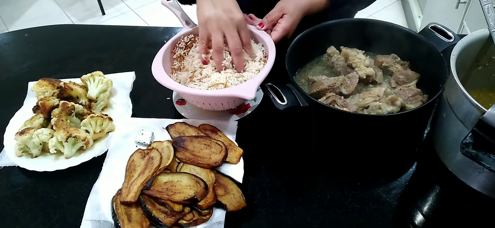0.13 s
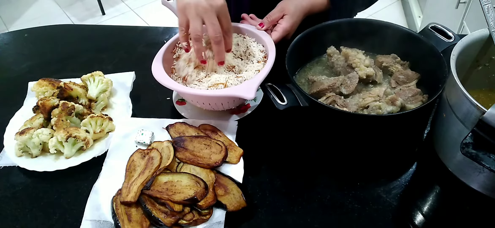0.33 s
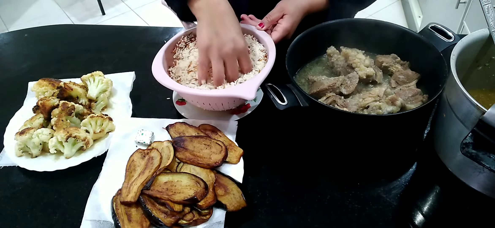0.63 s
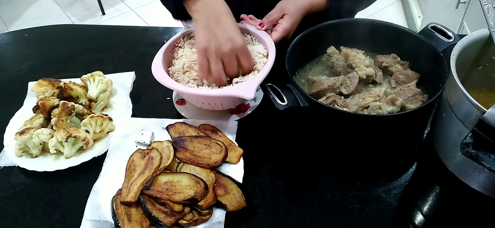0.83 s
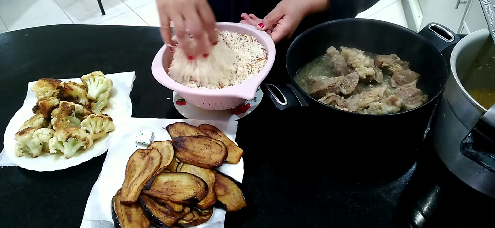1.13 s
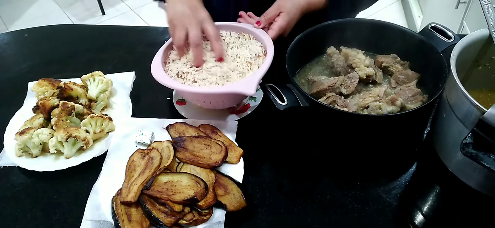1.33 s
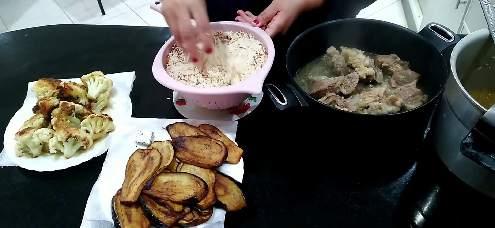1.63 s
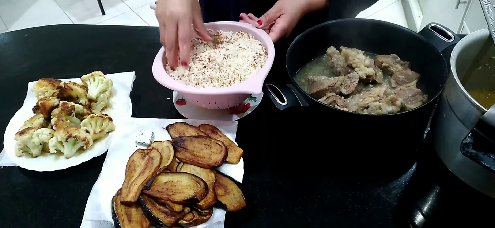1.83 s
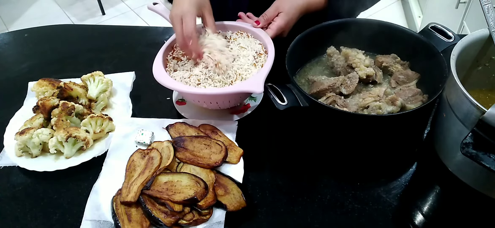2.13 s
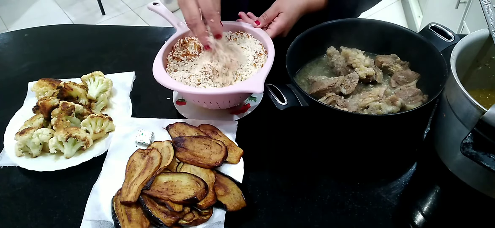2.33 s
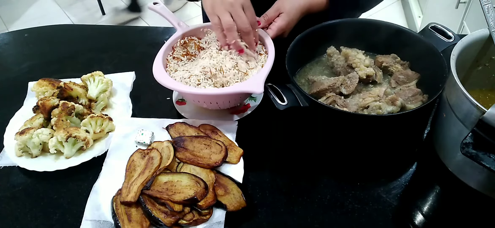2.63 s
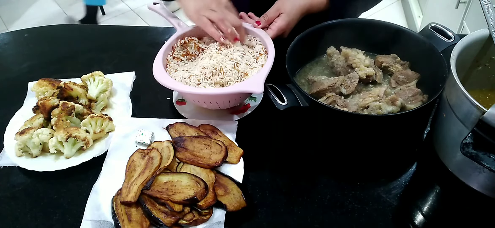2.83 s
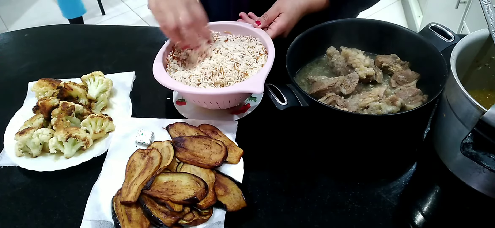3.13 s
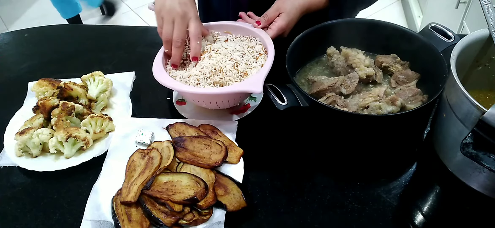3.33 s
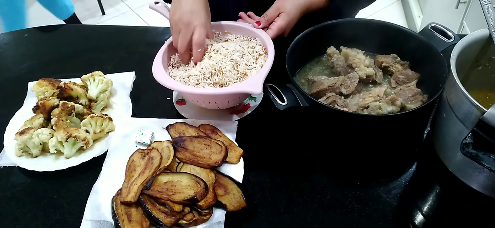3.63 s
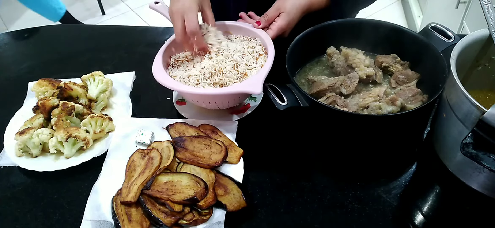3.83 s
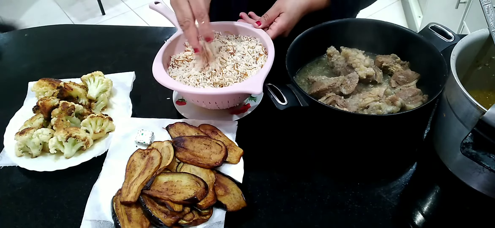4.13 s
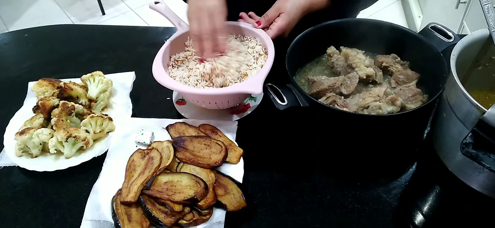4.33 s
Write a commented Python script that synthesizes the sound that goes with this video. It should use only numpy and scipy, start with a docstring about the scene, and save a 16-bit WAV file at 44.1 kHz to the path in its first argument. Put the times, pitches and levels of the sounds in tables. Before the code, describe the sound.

In a quiet kitchen, a low hum and soft rumble run under faint, even ticking, like a wind-up timer a little way off. Close by, a hand sweeps through dry rice in a plastic colander, making brief grainy rustles, tiny clicks and soft rubs on the bowl. The strongest sweeps come early, followed by a pause and then a few gentler ones.

```python
"""Fingers stir dry rice and toasted noodles in a plastic colander in a quiet kitchen.
From the start: mains hum, a rumble, a dull swelling rush, and something like a clockwork timer ticking.
Near 0.5 s, then loudest at 1.1-1.3 s, finger sweeps make grains collide in short rustles; single grains
snap on the plastic and fingers scrape the bowl. A lull with faint ticking and hiss follows.
Lighter sweeps return from 2.7 s, the last at 4.4 s."""
import sys
import numpy as np
from scipy import signal
from scipy.fft import rfft, irfft
from scipy.io import wavfile
from scipy.ndimage import uniform_filter1d

SR = 44100
rng = np.random.default_rng(int(sys.argv[2]) if len(sys.argv) > 2 else 0)


def store_pcm(level_fs):
    """Save levels as 16-bit WAV."""
    pcm = np.round(np.clip(level_fs, -1, 1) * 32767).astype(np.int16)
    wavfile.write(sys.argv[1], SR, np.atleast_2d(pcm).T)


N = 198141
T = np.arange(N) / SR
HZ = np.fft.rfftfreq(N, 1 / SR)

# Finger sweeps. Each row: start in seconds, end in seconds, position of the hardest push (0-1),
# level in dB, tilt in dB per octave, digging share (0 pouring, 1 digging).
SWEEPS = [(0.511, 0.554, .45, -58, 0.5, 0.88), (0.536, 0.584, 0.5, -62, -3, 0.82),
          (1.067, 1.15, 0.68, -65, -2.5, 0.73), (1.126, 1.248, 0.41, -55.5, -2, 0.48),
          (1.194, 1.317, 0.38, -57, -2.5, 0.49), (2.744, 2.771, 0.5, -72.5, -1, 0.44),
          (2.768, 2.82, 0.56, -70, 0, 0.23), (2.821, 2.872, .25, -69.5, -7.5, .1),
          (3.272, 3.358, .2, -62, -2, 0.79), (3.436, 3.476, 0.2, -79, 1, .3),
          (3.482, 3.524, .4, -76.5, 3, 0.95), (3.523, 3.555, .55, -72, 2, 1),
          (3.55, 3.64, 0.69, -61.5, 1, 1), (3.838, 3.88, 0.56, -71, -9.5, 0.49),
          (4.439, 4.468, 0.8, -70.5, 4.5, 1)]


def amp(db):
    """Decibels to gain."""
    return 10 ** (np.asarray(db) / 20)


def unit_rms(x):
    """Scales to rms 1."""
    return x / np.sqrt(np.mean(x ** 2) + 1e-20)


def curve_at(points, hz):
    """Interpolates (Hz, value) points on a log-frequency axis."""
    points_hz, values = np.transpose(points)
    return np.interp(np.log(hz + 1), np.log(points_hz + 1), values)


def pan(left_db):
    """Stereo gains for a left-minus-right level."""
    return amp(np.array([[.5], [-.5]]) * left_db)


def add(mix, start_s, sound):
    """Mixes a stereo sound in at start_s."""
    part = mix[:, max(round(start_s * SR), 0):][:, :sound.shape[1]]
    part += sound[:, :part.shape[1]]


def colour(x, db_at_hz, size=1024):
    """Minimum-phase filter of unit energy."""
    log_gain = np.log(amp(db_at_hz(abs(np.fft.fftfreq(size, 1 / SR)))))
    taps = np.fft.ifft(np.exp(signal.hilbert(log_gain).conj())).real[:size // 2]
    return signal.fftconvolve(x, taps[None] / np.linalg.norm(taps), axes=1)[:, :x.shape[1]]


def collisions(samples, per_s, spread_db):
    """Random tiny impacts of uneven size, independent in each channel."""
    size = amp(spread_db * np.minimum(rng.exponential(1, (2, samples)), 3))
    sign = rng.choice([-1, 1], (2, samples))
    hits = rng.random((2, samples)) < per_s / SR
    return unit_rms(size * sign * hits)


def swells(rows, rest_db):
    """Gain of Gaussian swells, summed in power over a resting level."""
    power = sum((amp(db) * np.exp(-((T - mid_s) / half_s) ** 2)) ** 2 for mid_s, half_s, db in rows)
    return np.sqrt(amp(rest_db) ** 2 + power)


def diffuse_noise(spectrum):
    """Unit-rms noise; the channels agree in the bass and part in the treble."""
    # Each row: frequency in Hz, left-right correlation.
    correlation = [(40, 0.75), (120, 0.89), (250, 0.74), (500, 0.53), (1000, -0.23), (2000, 0.04),
                   (15000, -0.075)]
    # Each row: frequency in Hz, left minus right in dB.
    balance = [(30, 6), (60, 5.5), (125, 0), (500, 1), (1500, -0.6), (8000, 0)]
    left, other = rfft(rng.standard_normal((2, N)))
    likeness = curve_at(correlation, HZ)
    pair = np.array([left, likeness * left + np.sqrt(1 - likeness ** 2) * other])
    return unit_rms(irfft(pair * amp(curve_at(spectrum, HZ)) * pan(curve_at(balance, HZ)), N))


def room(x, wet_db):
    """Adds the short tail of a tiled kitchen; the top treble dies first."""
    # Each row: frequency in Hz, T60 in seconds.
    decay_times = [(300, 0.24), (2500, 0.27), (5000, 0.23), (10000, 0.18)]
    echoes = rng.choice([-1., 1.], (2, SR // 2)) * (rng.random((2, SR // 2)) < 3000 / SR)
    hz, t, bands = signal.stft(echoes, SR, nperseg=256)
    decay = amp(-60 * t / curve_at(decay_times, hz)[:, None]) * (t > .005)
    tail = signal.istft(bands * decay, SR, nperseg=256)[1]
    return x + amp(wet_db) * signal.fftconvolve(x, tail / np.linalg.norm(tail[0]), axes=1)[:, :N]


def air(level_db=-54.5):
    """Steady low noise of the kitchen air."""
    # Each row: frequency in Hz, relative level in dB.
    spectrum = [(15, 4.5), (30, -2), (45, -3.5), (62, -8.5), (85, -4.5), (125, 0.5), (200, -15.5),
                (330, -16), (600, -27), (1000, -35.5), (1600, -50), (5000, -58.5), (9500, -55.5),
                (14000, -57)]
    return amp(level_db) * diffuse_noise(spectrum)


def mains_hum():
    """An appliance hums in steady tones."""
    # Each row: frequency in Hz, rms level before panning in dB.
    tones = [(100.1, -56), (125, -73.5), (168, -73), (300.3, -79), (570, -99)]
    hum = sum(amp(db) * np.sqrt(2) * np.sin(2 * np.pi * (hz * T + rng.random())) for hz, db in tones)
    return hum * pan(left_db=5.5)


def rumble(gain_db=-2):
    """A deep rumble comes and goes."""
    # Each row: frequency in Hz, relative level in dB.
    spectrum = [(10, -24.5), (28, -13.5), (38, -1), (46, 4.5), (52, -4.5), (62, -24), (110, -42.5),
                (400, -81.5)]
    # Each row: middle in seconds, half-width in seconds, relative level in dB.
    surges = [(.1, 0.21, -44.5), (.63, .19, -43.5), (1.1, 0.15, -44.5), (1.42, 0.34, -50.5),
              (2.0, 0.13, -47.5), (3.04, 0.059, -47.5), (3.5, 0.17, -52.5), (4.1, 0.44, -47.5)]
    bass = diffuse_noise(spectrum)
    local_power = uniform_filter1d((bass ** 2).mean(0), size=6000)
    steady = unit_rms(bass / np.sqrt(local_power + 0.14))  # flattened so the swells dominate
    return amp(gain_db) * swells(surges, rest_db=-55.5) * steady


def rush(rise_s=0.1, fall_s=0.19, rest_db=-73):
    """A dull rush repeatedly swells fast and dies more slowly."""
    # Each row: frequency in Hz, relative level in dB.
    spectrum = [(80, -22), (190, 7), (270, 5.5), (450, -1.5), (680, -2.5), (900, -18.5), (1300, -32),
                (2500, -33.5), (5000, -57)]
    # Each row: peak time in seconds, level in dB.
    peaks = [(.02, -58.5), (0.442, -55), (.99, -59), (1.55, -64.5), (2.33, -69), (3.949, -59), (4.42, -63)]
    power = amp(rest_db) ** 2
    for peak_s, db in peaks:
        envelope = np.exp(-np.where(T < peak_s, ((T - peak_s) / rise_s) ** 2, (T - peak_s) / fall_s))
        power = power + (amp(db) * envelope) ** 2
    return np.sqrt(power) * diffuse_noise(spectrum)


def escapement(rattle_s, decay_s, ring_db, pitch_ratio):
    """One strike: the metal rings and the parts rattle briefly."""
    # Metal modes. Each row: frequency in Hz at pitch ratio 1, relative level in dB, T60 in seconds.
    modes = [(2173, 3.5, 0.043), (2383, 1, 0.033), (2520, -12, 0.02), (3390, -11.5, 0.16),
             (8970, -0.5, 0.025), (9000, -3, 0.011), (9850, -15, 0.026)]
    # Each row: frequency in Hz, relative level in dB.
    rattle_spectrum = [(500, 3.5), (1500, -7), (2200, 2), (2700, -2), (3400, -2), (4700, -8.5),
                       (5900, -8.5), (7500, -13.5), (8800, -4.5), (9900, -4.5), (11000, -22.5),
                       (15000, -25.5)]
    ring_rise_s, rattle_rise_s, release_s, detune = 0.0024, 0.0056, 0.0087, 0.012
    t = np.arange(SR // 10) / SR
    ring = np.zeros(len(t))
    for hz, db, t60_s in modes:
        mode_hz = pitch_ratio * hz * rng.normal(1, detune)
        ring += amp(db - 60 * t / t60_s) * np.sin(2 * np.pi * mode_hz * t)
    gate = np.clip(t / rattle_rise_s, 0, 1) * np.clip((rattle_s - t) / release_s, 0, 1)
    impacts = collisions(len(t), per_s=7600, spread_db=8.5) * np.exp(-t / decay_s) * gate
    rattle = colour(impacts, lambda hz: curve_at(rattle_spectrum, hz))
    return amp(ring_db) * ring * np.clip(t / ring_rise_s, 0, 1) + rattle


def clockwork(first_s=0.056, period_s=0.4609, tock_delay_s=0.245, tock_db=-71.5):
    """A strong tick alternates with a weak, shorter, slightly lower tock."""
    # Each row: tick level in dB, gain of the ring against the rattle in dB.
    ticks = [(-61.5, -2.5), (-59.5, 3), (-62, -9.5), (-64, -10), (-66, -5), (-64.5, -13), (-64.5, -3),
             (-60, -8), (-61, -2), (-63.5, -2.5)]
    out = np.zeros((2, N))
    for k, (db, ring_db) in enumerate(ticks):
        start_s = first_s + k * period_s
        tick = escapement(rattle_s=0.031, decay_s=0.03, ring_db=ring_db, pitch_ratio=1)
        tock = escapement(rattle_s=0.021, decay_s=0.044, ring_db=-7.5, pitch_ratio=0.93)
        add(out, start_s, amp(db) * tick)
        add(out, start_s + tock_delay_s, amp(tock_db) * tock)
    return out * pan(left_db=2.8)


def grainy_hiss(rest_db=-87.5, settle_db=-31, settle_s=0.096):
    """A faint grainy hiss swells, partly just after the ticks, and settles after each sweep."""
    # Each row: frequency in Hz, relative level in dB.
    spectrum = [(500, -4), (1300, -0.5), (2500, -0.5), (4000, -2.5), (6500, -10), (9500, -9.5),
                (12000, -35)]
    # Each row: middle in seconds, half-width in seconds, level in dB.
    faint_swells = [(1.97, 0.13, -87), (2.88, 0.048, -83.5), (3.3, 0.42, -91), (3.95, 0.31, -84)]
    power = swells(faint_swells, rest_db) ** 2
    for start_s, end_s, _, db, _, _ in SWEEPS:
        since_s = T - (start_s + end_s) / 2
        power += (since_s > 0) * (amp(db + settle_db) * np.exp(-abs(since_s) / settle_s)) ** 2
    hiss = collisions(N, per_s=5500, spread_db=2.0)
    return np.sqrt(power) * colour(hiss, lambda hz: curve_at(spectrum, hz))


def scrapes():
    """Friction on the bowl, one resonance each: hollow under finger pads, sharp under nails."""
    # Each row: middle in seconds, half-width in seconds, resonance in Hz,
    # resonance half-width in octaves, level in dB.
    rubs = [(0.045, 0.16, 222, 0.24, -65), (0.52, 0.18, 202, 0.23, -62.5), (0.95, 0.021, 764, 0.23, -69),
            (1.04, 0.11, 187, 0.31, -67.5), (1.113, 0.015, 3400, 0.1, -66), (1.166, 0.028, 3320, 0.13, -59),
            (1.586, 0.12, 677, 0.21, -69), (3.09, 0.06, 240, 0.33, -66), (3.296, 0.0069, 800, 1, -69),
            (3.385, 0.12, 910, 0.34, -77.5), (3.957, 0.087, 486, 0.075, -67)]
    out = np.zeros((2, N))
    for mid_s, half_s, peak_hz, width_oct, db in rubs:
        noise = rng.standard_normal((2, N))
        rub = colour(noise, lambda hz: -20 * np.log10(1 + (np.log2((hz + 1) / peak_hz) / width_oct) ** 2))
        out += amp(db) * np.exp(-((T - mid_s) / half_s) ** 2) * rub
    return out


def rice_spectrum(tilt_db_per_oct, digging):
    """Colliding grains, dB as a function of Hz: a pouring-digging blend, tilted above 1500 Hz."""
    # Rice pouring off the fingers. Each row: frequency in Hz, relative level in dB.
    poured = [(200, -21), (700, -26), (1300, -27.5), (2200, -7.5), (2800, -2), (3400, 6), (4000, -1.5),
              (4900, 3), (6000, -2.5), (7500, -1.5), (9400, -4.5), (10800, -14.5), (13000, -23),
              (15500, -20)]
    # Rice ground together by digging. Same columns.
    dug = [(200, -9), (700, 10.5), (1300, -0.5), (2200, 3), (3500, 2), (5000, 0), (7500, -3), (9600, 5.5),
           (11500, -5), (13300, -10), (15500, -21)]
    return lambda hz: ((1 - digging) * curve_at(poured, hz) + digging * curve_at(dug, hz)
                       + tilt_db_per_oct * np.log2(np.maximum(hz, 1500)))


def snaps(contact_s=0.00072, chatter_s=0.015, chatter_db=-14):
    """Single grains strike the colander and unsettle their neighbours."""
    # Each row: start in seconds, level in dB.
    strikes = [(.0205, -83.5), (0.116, -81), (0.4998, -72), (0.5096, -64.5), (1.1015, -70), (1.1515, -60),
               (1.1665, -62), (1.1747, -57), (1.189, -55), (1.1928, -56), (1.2588, -59.5), (1.3685, -83),
               (1.8494, -74.5), (1.8555, -82), (2.6965, -80.5), (2.7385, -76.5), (2.9004, -79.5),
               (3.222, -80.5), (3.2668, -69.5), (3.301, -64), (4.4611, -72)]
    out = np.zeros((2, N))
    t = np.arange(SR // 50) / SR
    envelope = np.exp(-t / contact_s) + amp(chatter_db) * np.exp(-t / chatter_s)
    for start_s, db in strikes:
        add(out, start_s, amp(db) * unit_rms(rng.choice([-1, 1], (2, len(t))) * envelope))
    return colour(out, rice_spectrum(tilt_db_per_oct=3.5, digging=0.2)) * pan(left_db=2.0)


def sweeps(push_exponent=1.12, clump_db=1.0, coarse_db=-8):
    """A finger's push builds and eases; fine grains collide in clumps, a few coarse ones crackle."""
    out = np.zeros((2, N))
    t = np.arange(SR // 3) / SR
    for start_s, end_s, crest, db, tilt_db_per_oct, digging in SWEEPS:
        stroke = np.interp(t / (end_s - start_s), [0, crest, 1], [0, 1, 0])
        flow = np.sin(np.pi / 2 * stroke) ** push_exponent
        wander = unit_rms(uniform_filter1d(rng.standard_normal(len(t)), size=160))
        clumps = unit_rms(amp(clump_db * wander))
        fine = clumps * collisions(len(t), per_s=3500, spread_db=4.5)
        coarse = amp(coarse_db) * collisions(len(t), per_s=220, spread_db=4)
        rustle = colour(unit_rms(fine + coarse) * flow, rice_spectrum(tilt_db_per_oct, digging))
        add(out, start_s, amp(db) * rustle)
    return out * pan(left_db=0.4)


def scene():
    """Rice close by, clockwork further off, the kitchen behind."""
    close = room(sweeps() + grainy_hiss() + snaps() + scrapes(), wet_db=-17.5)
    timer = room(clockwork(), wet_db=-8.5)
    return close + timer + rush() + mains_hum() + rumble() + air()


def record(dry):
    """Steep linear-phase low-pass."""
    cutoff_hz = 15730
    taps = signal.firwin(511, cutoff_hz, window=("kaiser", 9), fs=SR)
    padded = np.pad(dry, ((0, 0), (255, 255)), "reflect")
    return signal.oaconvolve(padded, taps[None], "valid")


dry = scene()
out = record(dry)
store_pcm(out)
```